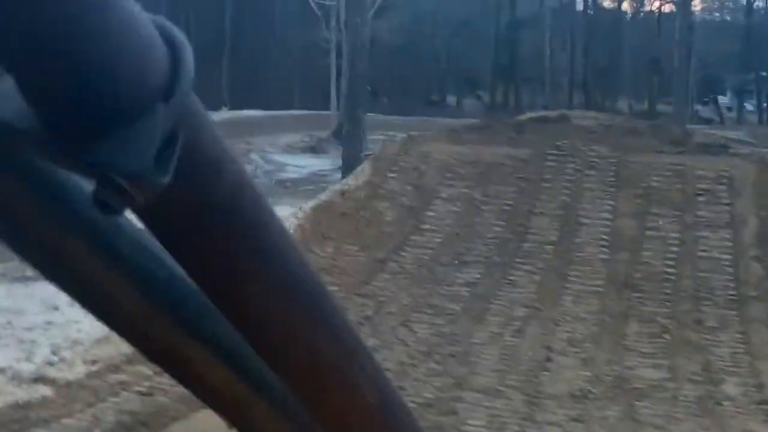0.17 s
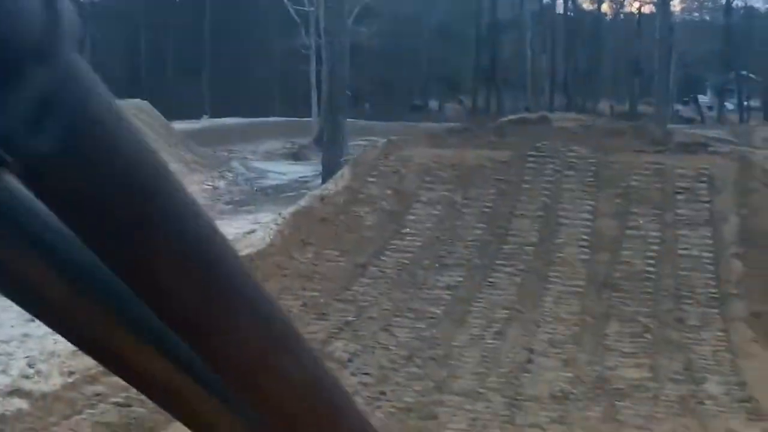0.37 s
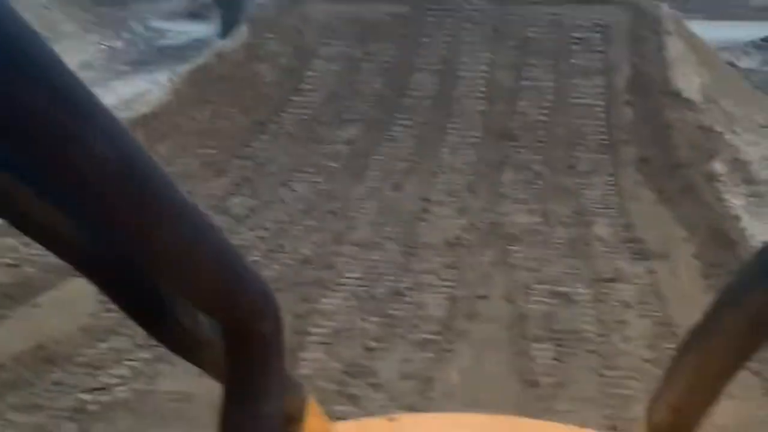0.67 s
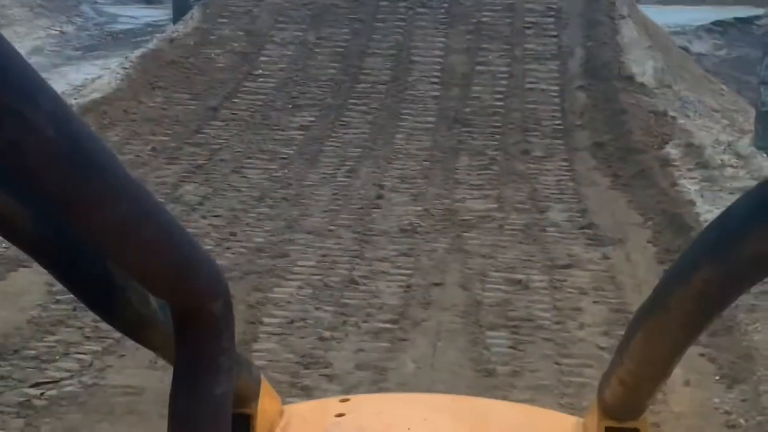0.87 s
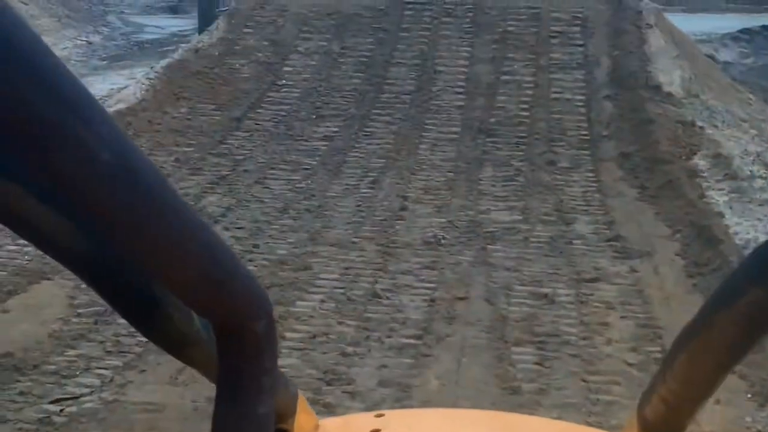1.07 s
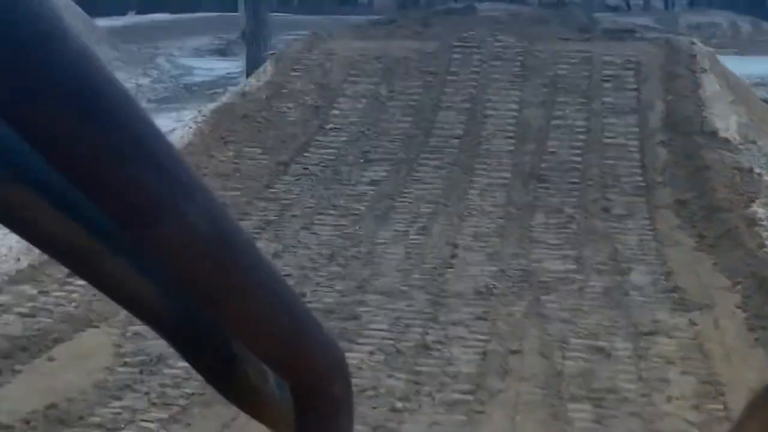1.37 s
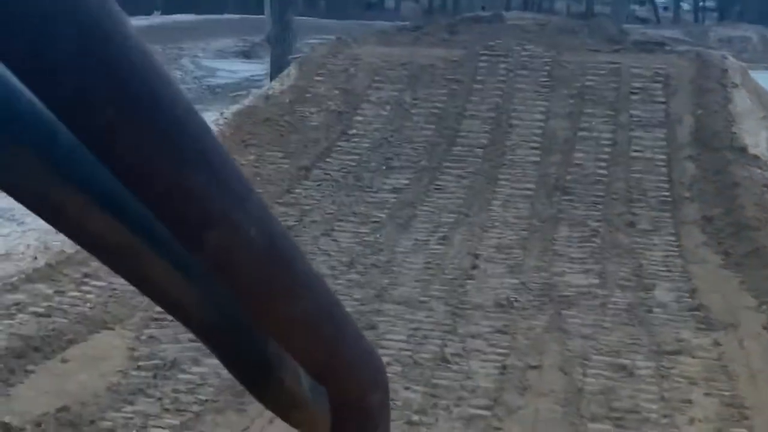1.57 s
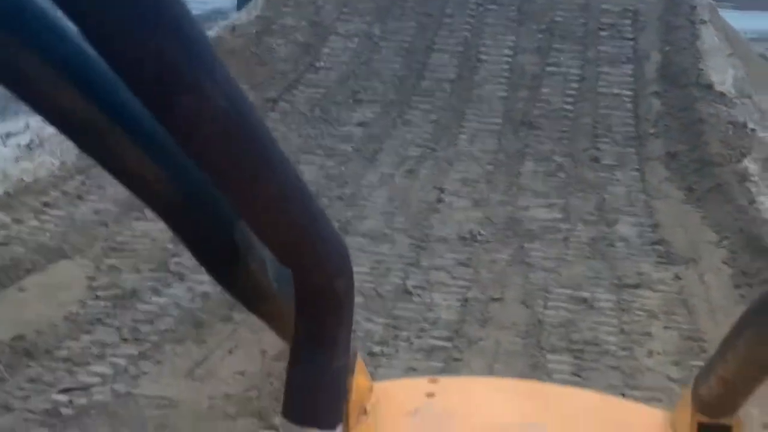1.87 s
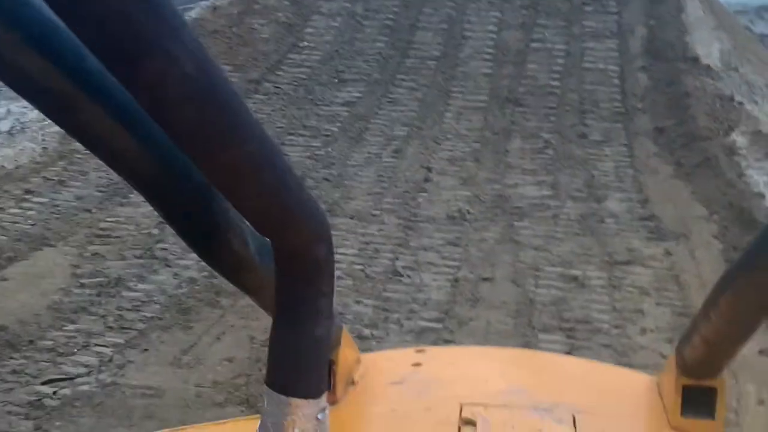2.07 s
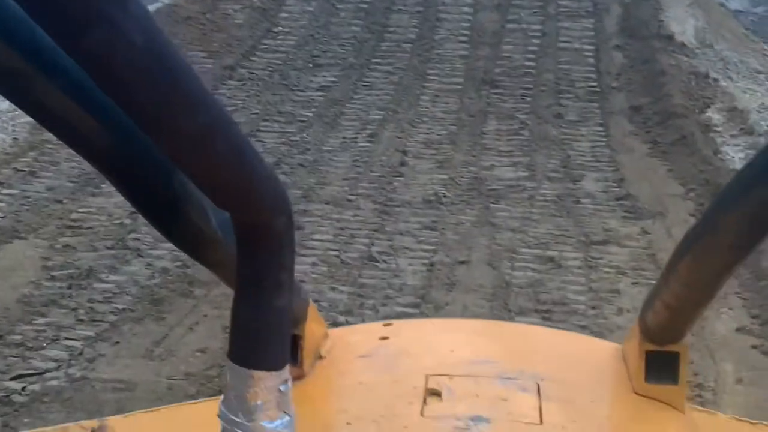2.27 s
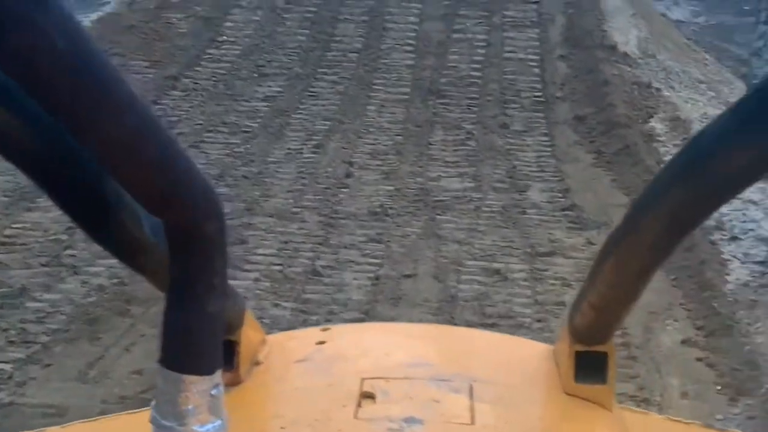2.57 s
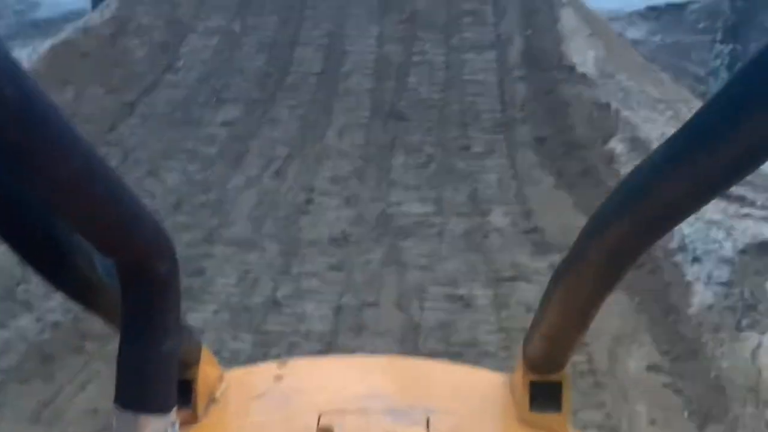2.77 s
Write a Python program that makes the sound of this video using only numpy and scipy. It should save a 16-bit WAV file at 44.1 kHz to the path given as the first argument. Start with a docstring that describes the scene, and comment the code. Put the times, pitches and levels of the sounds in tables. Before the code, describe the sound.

From the seat of a crawler machine outdoors, a low, gravelly diesel hum runs unbroken and even, with quick uneven clinks from the track links and a few faint bright pings, picked up by a small handheld stereo microphone.

```python
"""Tracked tractor, from the seat

A tracked tractor crawls over dirt. Its four-cylinder diesel hums on multiples of the four-stroke cycle;
each combustion puffs up a noise roar and knocks ring the block. Below, the track links clank and rattle
as runs of ticks through struck modes, with loose parts pinging and short tones surging.
Two microphone ports a few centimetres apart hear it."""
import sys
import numpy as np
from scipy import signal
from scipy.fft import rfft, irfft
from scipy.io import wavfile
from scipy.ndimage import uniform_filter1d

SR = 44100
rng = np.random.default_rng(int(sys.argv[2]) if len(sys.argv) > 2 else 0)


def wrap_up_sound(samples):
    """Save the sound to the file named by the first command line argument, as 16-bit audio."""
    columns = np.atleast_2d(samples).T
    # keep every value between -1 and 1, then stretch to whole-number steps
    tamed = np.clip(columns, -1, 1)
    steps = np.round(tamed * 32767).astype(np.int16)
    wavfile.write(sys.argv[1], SR, steps)


N = 128772

# Engine speed. Each row: time in seconds, speed in rpm.
ENGINE_SPEED = [(0.0, 1492.6), (0.195, 1499.0), (0.389, 1499.3), (0.584, 1475.4), (0.779, 1486.8),
                (0.973, 1486.5), (1.168, 1482.8), (1.363, 1485.8), (1.557, 1488.7), (1.752, 1490.8),
                (1.947, 1495.2), (2.141, 1485.8), (2.336, 1487.5), (2.531, 1494.0), (2.725, 1488.8),
                (2.92, 1512.9)]


def gain_of(db):
    """Amplitude factor of a level in dB."""
    return 10 ** (np.asarray(db) / 20)


def evened(x):
    """Scale to an rms of one."""
    return x / np.sqrt(np.mean(x ** 2) + 1e-20)


def read(points, hz):
    """Read a (Hz, value) curve along a logarithmic frequency axis."""
    f, value = np.transpose(points)
    return np.interp(np.log(hz + 1), np.log(f + 1), value)


def ring(x, hz, t60):
    """A struck mode: each unit click starts a sine of about unit height that falls 60 dB in t60 seconds."""
    r = 10 ** (-3 / (t60 * SR))
    w = 2 * np.pi * hz / SR
    return signal.lfilter([0, np.sin(w)], [1, -2 * r * np.cos(w), r * r], x)


def slow(count):
    """A slow random drift of unit rms, straight lines through count points."""
    return evened(np.interp(np.arange(N), np.linspace(0, N, num=count), rng.standard_normal(count)))


def crank():
    """Four-stroke cycles gone by: one per two revolutions."""
    start_cycle = .17
    s, rpm = np.transpose(ENGINE_SPEED)
    return start_cycle + np.cumsum(np.interp(np.arange(N) / SR, s, rpm)) / (120 * SR)


def swells():
    """Slow gain curves for the upper tones, the roar's low mids and the throb tones."""
    # Each row: time in seconds, then the gains of upper tones, low mids and throb tones in dB.
    swell_rows = [(0, 2, 2.5, -20), (.24, -4, 2.5, 6.5), (.4, 0.5, 0, -5), (.57, -0.5, 2, -17),
                  (.73, -0.5, 0, 8), (.89, -0.5, .5, -8), (1.05, 1, 1, 8.5), (1.22, 1, 0, 3),
                  (1.38, 1, 1, 1), (1.54, -2.5, 1.5, 5), (1.7, -0.5, .5, -1), (1.87, 1, 1.5, 8),
                  (2.03, 0, -2.5, 4), (2.19, -3, 0, 3), (2.35, -5.5, 0.5, -2), (2.51, -1.5, 0.5, 1.5),
                  (2.68, -8, 0.5, 7.5), (2.92, 2.5, 0, -7)]
    s, *levels_db = np.transpose(swell_rows)
    return [gain_of(np.interp(np.arange(N) / SR, s, db)) for db in levels_db]


def exhaust(cycles, upper_swell, throb_swell):
    """Sines locked to the crank: clean exhaust tones, then upper and throb tones wavering in phase."""
    # Exhaust tones. Each row: multiple of the four-stroke cycle, level in dB rms.
    exhaust_orders = [(4, -30), (7, -43.5), (8, -23.5)]
    # Faint upper tones of the block. Each row: multiple of the cycle, level in dB rms before the swell.
    upper_orders = [(12, -39.5), (16, -43.5), (17, -48), (20, -64), (21, -65), (32, -40.5), (38, -52),
                    (42, -49.5), (43, -49), (47, -54), (49, -46.5), (51, -49), (56, -52.5), (70, -54),
                    (72, -53), (77, -57.5), (80, -58.5)]
    # Tones that beat once a cycle with the 32nd multiple. Each row: multiple, dB rms before the swell.
    throb_orders = [(30, -53), (31, -42), (33, -53)]
    beat_lag = .387  # engine cycles
    waver = .035  # rms, in turns of each tone
    tones = np.zeros(N)
    for multiple, db in exhaust_orders:
        tones += np.sqrt(2) * gain_of(db) * np.cos(2 * np.pi * multiple * cycles)
    for orders, swell in [(upper_orders, upper_swell), (throb_orders, throb_swell)]:
        for multiple, db in orders:
            phase = multiple * (cycles - beat_lag) + waver * slow(count=24)
            tones += swell * np.sqrt(2) * gain_of(db) * np.cos(2 * np.pi * phase)
    return tones


def fan():
    """One tone at a fixed pitch, drifting in level and a little in phase."""
    fan_hz, level_db = 165.6, -37.5  # level as rms
    level_waver_db, phase_waver = 2.5, .07  # both rms, the phase in turns
    phase = fan_hz * np.arange(N) / SR + phase_waver * slow(count=20)
    tone = gain_of(level_waver_db * slow(count=30)) * np.cos(2 * np.pi * phase)
    return gain_of(level_db) * evened(tone)


def roar(cycles):
    """Patchy noise of block, fan and tracks, swelling at every firing, partly alike at the two ports."""
    # Roar spectrum. Each row: frequency in Hz, relative density in dB per Hz.
    spectrum = [(15, -25), (35, -14), (55, -11), (70, -1.5), (110, -5), (160, -1.5), (215, -1.5), (270, -8),
                (330, -5.5), (390, -6), (440, -11.5), (620, -8), (820, -12.5), (1000, -14.5), (1750, -18),
                (2800, -25.5), (4200, -32), (6000, -35.5), (8500, -37.5), (10000, -40.5), (12500, -39),
                (14400, -44), (15800, -51)]
    # How far each firing puffs up the roar. Each row: frequency in Hz, depth 0-1 as a share of power.
    puff_depth = [(150, 0), (700, 0.28), (2500, 0.07), (6000, 0.2), (12000, 0.35)]
    # Relative puff strength of the four cylinders, in firing order, in dB.
    cylinder_db = [1, 1, 1.5, -3.5]
    # Drifting patches. Each row: frequency in Hz, rms depth in dB.
    patch_depth = [(200, 1.26), (1000, 1.44), (6000, 2.5)]
    # Left-right likeness. Each row: frequency in Hz, likeness 0-1.
    likeness = [(60, 0.88), (200, 1), (400, 0.8), (800, 0.55), (1600, 0.52), (2600, 0.44), (3500, 0),
                (4200, 0), (4800, 0.97), (5600, 0.67), (7000, 1), (14000, 1)]
    roar_db = -28.5  # rms
    puff_s, scatter_db = .005, 2  # time to a puff's peak, rms scatter from firing to firing

    # short-time frames of random spectra
    hop, size = 64, 256
    frames = N // hop + 9
    hz = np.fft.rfftfreq(size, 1 / SR)
    a, b, c, d, patches = rng.standard_normal((frames, len(hz), 5)).T
    patches = evened(uniform_filter1d(uniform_filter1d(patches, 4, 0), 24, 1))
    patch_gain = gain_of(read(patch_depth, hz)[:, None] * patches)

    # four firings a cycle, each a quick rise and a slower fall
    strokes = 4 * cycles[np.minimum(np.arange(frames) * hop, N - 1)] + 0.42
    firing = strokes.astype(int)
    scatter = scatter_db * rng.standard_normal(200)[firing]
    strength = gain_of(np.array(cylinder_db)[firing % 4] + scatter)
    stroke_s = 30 / ENGINE_SPEED[4][1]
    since = strokes % 1 * stroke_s / puff_s
    puff = evened(strength * since * np.exp(-since))
    depth = read(puff_depth, hz)[:, None]
    puff_gain = np.sqrt(1 - depth + depth * puff ** 2)

    z = np.array([a + 1j * b, c + 1j * d]) * patch_gain * puff_gain
    near, apart = rfft(signal.istft(z, nperseg=size, noverlap=size - hop)[1][:, :N])
    fine_hz = np.fft.rfftfreq(N, 1 / SR)
    same = read(likeness, fine_hz)
    common = np.sqrt((1 + same) / 2) * near
    own = np.sqrt((1 - same) / 2) * apart  # opposite in sign at the two ports
    ports = np.array([common + own, common - own]) * gain_of(read(spectrum, fine_hz))
    return gain_of(roar_db) * evened(irfft(ports, N))


def knocks(cycles):
    """Combustion knock: one click per firing, nearly alike from cycle to cycle."""
    # Each row: the cylinder's place in the cycle 0-1, relative level in dB.
    knock_places = [(.245, 0.5), (.5, 0), (.76, 5), (.995, 3.5)]
    jitter_s, scatter_db = .0002, 2  # both rms
    out = np.zeros(N)
    for place, db in knock_places:
        at = np.flatnonzero(np.diff(np.floor(cycles - place)))
        late, size = rng.standard_normal((len(at), 2)).T
        at = np.clip(at + np.round(jitter_s * SR * late).astype(int), 0, N - 1)
        out[at] += gain_of(db + scatter_db * size)
    return out


def block(cycles):
    """Knocks, and combustion noise that peaks near them, ring the resonances of the block."""
    # Long resonances. Each row: frequency in Hz, level in dB rms, t60 in seconds.
    resonances = [(483, -45, 0.085), (581, -43, 0.066), (626, -55, 0.078), (701, -42.5, 0.13),
                  (895, -45.5, 0.14), (976, -52, 0.052), (987.4, -46, 0.15), (1247, -49.5, 0.13),
                  (1365, -49, 0.049), (1665, -51, 0.12), (2080, -54.5, 0.14), (3870, -71, 0.076),
                  (6030, -73, 0.13), (7200, -92, 0.031)]
    # Short rings of a knock. Each row: frequency in Hz, level in dB rms, t60 in seconds.
    knock_rings = [(620, -45.5, 0.02), (920, -45, 0.044), (1177, -47.5, .025), (1400, -52, 0.028),
                   (1920, -54, 0.023), (2270, -55, 0.026)]
    sharpness, knock_share = 2, .4  # of the noise peaks; of clicks against noise
    gate = np.exp(sharpness * np.cos(2 * np.pi * (4 * cycles - .1)))
    clicks = evened(knocks(cycles))
    out = np.zeros(N)
    # neighbouring modes alternate in sign
    for k, (hz, db, t60) in enumerate(resonances):
        noise = evened(gate * rng.standard_normal(N))
        drive = knock_share * clicks + (1 - knock_share) * noise
        out += (-1) ** k * gain_of(db) * evened(ring(drive, hz, t60))
    for k, (hz, db, t60) in enumerate(knock_rings):
        out += (-1) ** k * gain_of(db) * evened(ring(clicks, hz, t60))
    return out


def clank(treble_db, length):
    """A quick run of ticks rings a track link's modes, with a scrape; treble_db tilts treble over bass."""
    # Track link modes. Each row: middle frequency in Hz, middle level in dB (relative), t60 in seconds.
    link_modes = [(1453, -1.5, 0.054), (1814, -5.5, 0.11), (2466, -8, 0.08), (2783, -3.5, 0.04),
                  (3382, -12.5, .12), (3790, -24, 0.17), (4400, -49, .05), (4820, -17, 0.11),
                  (5880, -14, .04), (6445, -16, .03), (7180, -10, .04), (7730, -11, .04)]
    link_db, scrape_db = -4, -2  # peaks before the tilt, relative to the clank's level
    ticks_per_s, split_hz = 1100, 4900
    mode_spread_db, pitch_spread = 3.5, 0.0074  # rms; pitch as a fraction
    t = np.arange(6000) / SR
    shape = np.minimum(t / 0.0011, 1) * np.exp(-t / length)
    noise = rng.standard_normal(len(t))
    ticks = noise * (rng.random(len(t)) < ticks_per_s / SR) * shape
    metal = np.zeros(len(t))
    for hz, db, t60 in link_modes:
        louder, sharper = rng.standard_normal(2)
        metal += gain_of(db + mode_spread_db * louder) * ring(ticks, hz * (1 + pitch_spread * sharper), t60)
    scrape = signal.lfilter([1, 0, -1], [1, -1.3, .45], noise) * shape
    sound = gain_of(link_db) * metal / abs(metal).max() + gain_of(scrape_db) * scrape / abs(scrape).max()
    top = signal.lfilter(*signal.butter(1, split_hz, "high", fs=SR), sound)
    return gain_of(-treble_db / 2) * (sound - top) + gain_of(treble_db / 2) * top


def tracks():
    """Track clanks at set times, with small rattles at random times between and over them."""
    # Each row: start in seconds, level in dB, treble against bass in dB, decay time to 1/e in seconds.
    clank_rows = [(0.063, -31.5, 9, 0.028), (0.0997, -33.5, 9, 0.028), (0.114, -40, 7, .01),
                  (0.148, -34, -16, 0.022), (0.2004, -33, 9, 0.019), (0.225, -41, 0, 0.025),
                  (0.292, -30, -11, 0.0093), (0.37, -36, -9, 0.019), (0.5365, -25, -5, 0.018),
                  (0.551, -31.5, -8, 0.031), (0.7244, -33, -6, 0.035), (1.0364, -34, 6, 0.021),
                  (1.07, -26.5, -7, 0.023), (1.108, -36, -2, .018), (1.191, -32, 0, 0.043),
                  (1.261, -28, 1, 0.018), (1.2894, -32.5, -15, 0.016), (1.407, -34.5, -15, 0.045),
                  (1.4394, -38, -10, 0.02), (1.513, -31.5, -3, 0.025), (1.5385, -30.5, -15, 0.022),
                  (1.591, -37, 2, 0.021), (1.667, -32, 2, 0.031), (1.758, -35, 4, 0.022),
                  (1.829, -34, 7, 0.016), (1.896, -31, -4, 0.026), (1.9944, -41, 4, 0.012),
                  (2.07, -37, 0, .012), (2.15, -39, 0, 0.011), (2.2276, -28.5, 2, 0.023),
                  (2.315, -40, 0, .01), (2.422, -28, -4, 0.018), (2.477, -31, -1, 0.019),
                  (2.5654, -31, 3, 0.023), (2.746, -29, -7, 0.01), (2.762, -32, -10, 0.0074),
                  (2.8806, -22.5, -6, 0.01)]
    rattles_per_s, rattle_db, rattle_spread_db = 22, -47, 5  # the softest level and the range above it
    count = round(rattles_per_s * N / SR)
    small = [(u * N / SR, rattle_db + rattle_spread_db * v, 0, .012) for u, v in rng.random((count, 2))]
    out = np.zeros(N + SR)
    for s, db, treble_db, length in list(clank_rows) + small:
        sound = clank(treble_db, length)
        out[round(s * SR):][:len(sound)] += gain_of(db) * sound
    return out[:N]


def pings():
    """Single bright rings of loose parts: sines with a short rise and an exponential decay."""
    # Each row: start in seconds, level in dB before the decay, frequency in Hz, t60 in seconds.
    ping_rows = [(.155, -37.5, 3660, 0.14), (1.54, -38, 4900, .12), (2.432, -38, 2300, 0.16),
                 (2.431, -41, 3280, .1), (2, -46, 8500, .06), (2.881, -34, 9300, 0.065),
                 (2.672, -34, 3310, 0.075)]
    t = np.arange(8000) / SR
    out = np.zeros(N + SR)
    for s, db, hz, t60 in ping_rows:
        envelope = gain_of(db - 60 * t / t60) * np.minimum(t / 0.0037, 1)
        out[round(s * SR):][:len(t)] += envelope * np.sin(2 * np.pi * hz * t)
    return out[:N]


def surges():
    """Brief tonal surges of the machine: sines under a bell-shaped swell."""
    # Each row: middle in seconds, frequency in Hz, peak in dB, width in seconds between the 1/e points.
    surge_rows = [(0.717, 690, -36, .1), (1.063, 700, -33.5, 0.15), (1.127, 770, -35.5, 0.089),
                  (1.457, 985, -37.5, 0.14), (1.5, 895, -50, 0.088), (1.852, 700, -32, 0.083),
                  (2.0, 490, -43, .08), (2.514, 575, -40, 0.068), (2.52, 890, -36.5, 0.12),
                  (2.79, 960, -36, .14), (2.83, 580, -45, 0.055)]
    t = np.arange(N) / SR
    out = np.zeros(N)
    for s, hz, db, length in surge_rows:
        bell = np.exp(-(2 * (t - s) / length) ** 2)
        out += gain_of(db) * bell * np.sin(2 * np.pi * (hz * t + rng.random()))
    return out


def scene():
    """Engine and tracks; only the roar differs between the two ports here."""
    cycles = crank()
    upper_swell, mids_swell, throb_swell = swells()
    noise = roar(cycles) + block(cycles)
    low_mids = signal.sosfiltfilt(signal.butter(1, [130, 1100], "band", fs=SR, output="sos"), noise)
    engine = noise + (mids_swell - 1) * low_mids + exhaust(cycles, upper_swell, throb_swell) + fan()
    return engine + tracks() + pings() + surges()


def record(dry):
    """The ports differ in phase and balance; peaks are rounded softly; then the treble is cut off."""
    # Port balance. Each row: frequency in Hz, left over right in dB.
    balance = [(60, 0), (180, 1.5), (530, 1.0), (1560, -1), (4640, -0.5), (13800, 0.0)]
    # Port phase. Each row: frequency in Hz, radians by which the left port leads.
    port_lead = [(0, 0), (400, -.45), (780, -.9), (1600, 0), (2300, .7), (3800, 1.5), (4750, 3.14),
                 (6950, 6.28), (15100, 15.7), (22050, 23.7)]
    overload, edge_hz = .5, 15300  # ceiling of the rounding in full scale; top of the band
    margin = 4096  # samples mirrored at both ends, trimmed off again
    wide = np.pad(dry, ((0, 0), (margin, margin)), "reflect")
    hz = np.fft.rfftfreq(wide.shape[1], 1 / SR)
    # each port takes half of the difference
    lead = np.interp(hz, *np.transpose(port_lead))
    half = gain_of(read(balance, hz) / 2) * np.exp(.5j * lead)
    ports = irfft(rfft(wide) * np.array([half, 1 / half]), wide.shape[1])
    rounded = overload * np.tanh(ports / overload)
    edge = signal.firwin(511, edge_hz, window=("kaiser", 9), fs=SR)[None]
    return signal.oaconvolve(rounded, edge, "same")[:, margin:margin + N]


dry = scene()
out = record(dry)
wrap_up_sound(out)
```